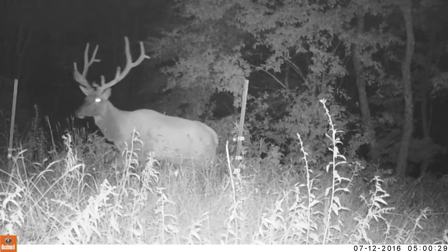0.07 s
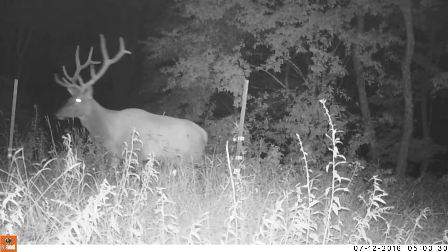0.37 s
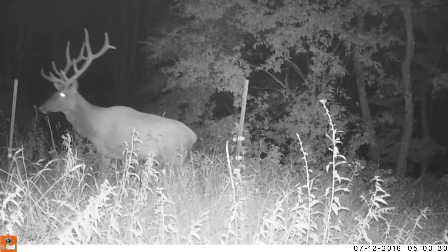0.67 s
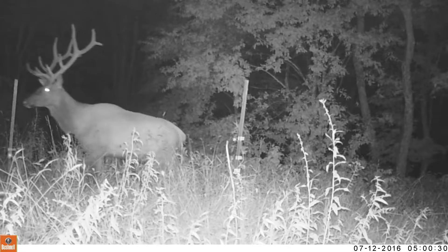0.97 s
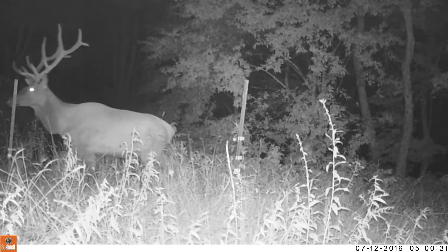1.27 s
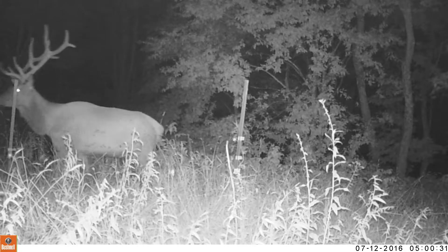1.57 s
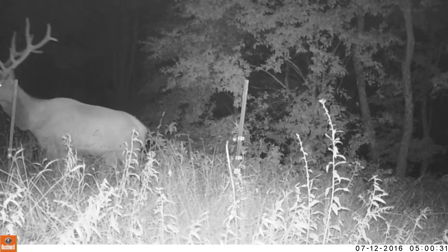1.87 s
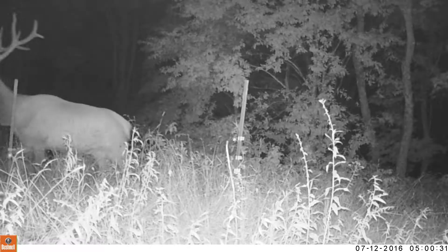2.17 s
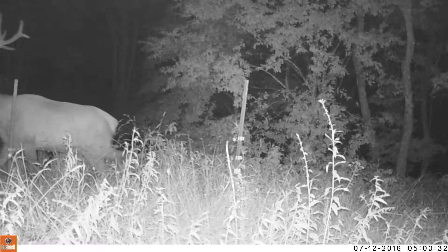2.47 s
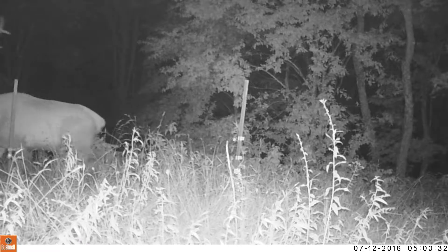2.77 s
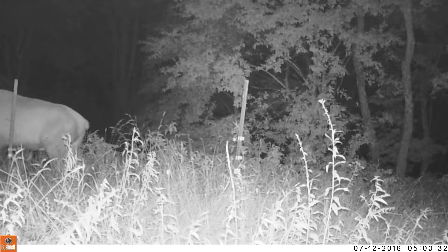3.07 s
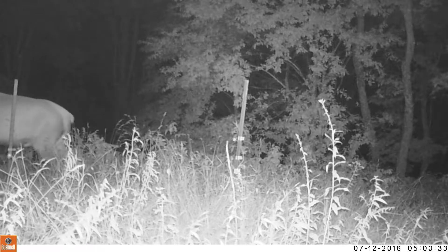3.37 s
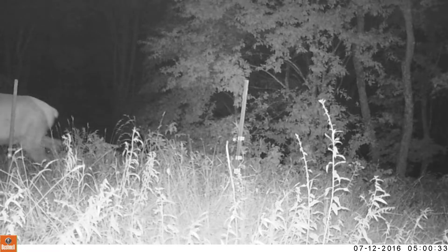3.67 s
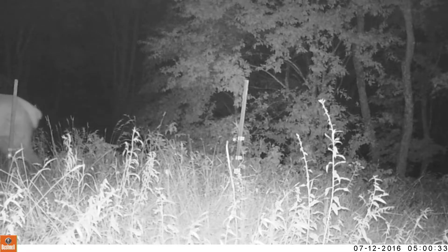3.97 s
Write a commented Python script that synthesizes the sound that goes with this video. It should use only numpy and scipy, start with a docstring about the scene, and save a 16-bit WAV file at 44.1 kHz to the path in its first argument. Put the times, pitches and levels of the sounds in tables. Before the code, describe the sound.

An elk walks through tall grass, making very faint, grainy swishes around 0.3 seconds, from 0.6 to 1.5, near 2 and 2.5, and from 3.1 to 4. Tiny dry stalk ticks come near 1, 1.9, 2.5, 3.1 and 4 seconds. Steady microphone rumble and hiss nearly cover everything, with a faint drifting murmur of night air and a few soft, dull bumps in roughly the first two seconds.

```python
"""An elk walks through tall grass at night, a few metres from a trail camera.
Each stride brushes the blades against its legs in a soft, grainy swish,
and now and then a bent dry stalk lets go with a tick. It all lies barely above the
microphone's steady rumble and hiss, with a few dull bumps and a faint murmur of night air."""
import sys
import numpy as np
from scipy import signal
from scipy.fft import rfft, irfft
from scipy.io import wavfile
from scipy.ndimage import uniform_filter1d

SR = 44100
rng = np.random.default_rng(int(sys.argv[2]) if len(sys.argv) > 2 else 0)


def wav_out(sig):
    """Save sig, one row per channel (or a flat mono array), as 16-bit PCM at SR to the path in sys.argv[1]."""
    wavfile.write(sys.argv[1], SR, np.round(np.clip(np.atleast_2d(sig).T, -1, 1) * 32767).astype(np.int16))


N = 176400

# leg swishes through the grass: centre t/s, half length/s, level/dB, hiss f/Hz, hiss width/Hz
SWISHES = [(.254, .028, -73, 5300, 1200), (.32, 0.026, -73.5, 4400, 2000), (.62, 0.026, -78.5, 4300, 2800),
           (0.79, .04, -78.5, 5200, 1400), (0.924, 0.051, -78.5, 4900, 2800),
           (1.102, 0.032, -79.5, 4360, 2800), (1.417, 0.039, -74, 5240, 2000),
           (1.515, 0.044, -75.5, 4370, 2400), (1.964, 0.071, -79.5, 4200, 2800),
           (2.343, .051, -84, 4600, 2800), (2.465, .028, -77.5, 5600, 650),
           (2.526, 0.12, -78.5, 3870, 2800), (3.107, 0.087, -76, 4400, 2700), (3.27, .018, -77, 5500, 1100),
           (3.31, 0.049, -77.5, 3500, 1500), (3.60, .17, -81, 4700, 2800), (3.97, 0.047, -77, 5050, 1700)]
# EQ curve of brushed blades: f/Hz, level/dB
BLADE_EQ = [(500, -9), (2000, -11), (3000, -0.5), (3900, 0), (5600, -7), (6800, -5.5), (9000, -13),
            (13500, -11)]
# dry stalk ticks: t/s, level/dB, f/Hz, decay/s
STALK_TICKS = [(.896, -69, 5300, .003), (0.999, -64, 3300, 0.0018), (1.089, -69.3, 4300, .002),
               (1.884, -69.5, 4600, .003), (2.525, -69, 3470, .005), (3.042, -67, 3600, .002),
               (3.114, -71, 4150, .01), (3.967, -68.5, 5000, .002)]
# soft bumps in the rumble: centre t/s, level/dB, f/Hz
LOW_BUMPS = [(.07, -56, 30.2), (.705, -50, 29.8), (1.11, -50.5, 49.3), (1.419, -51.5, 58),
             (2.09, -49.5, 41.4)]
# fader curve of the night air: t/s, level/dB
AIR_LEVELS = [(0, -84), (.25, -71), (.5, -78), (.76, -70), (1.0, -76.5), (1.45, -75.5), (1.97, -73.5),
              (2.4, -79.5), (3.2, -74), (4, -76)]
# EQ curve of the microphone's rumble and hiss: f/Hz, level/dB
MIC_NOISE_EQ = [(5, -17), (9, 5.5), (18, 3), (27, -2), (50, -7), (100, -12), (170, -16), (240, -20.5),
                (310, -22.5), (400, -27.5), (800, -34.5), (1400, -39.5), (2500, -44), (5000, -47),
                (7000, -49.5), (10000, -50.5), (13500, -51)]


def grass_swishes(t):
    """Blades flick and rub against the legs; each swish swells and fades with its own band of hiss."""
    flicks_per_s, spread_db, rub_db, blades_db = 1400, 4, -2, 0.5
    flutter_db, flutter_per_s = 1, 22
    flicks = (rng.random(N) < flicks_per_s / SR) * rng.choice([-1, 1], N)
    accents = undb(spread_db * np.minimum(rng.exponential(size=N), 4))  # a few grains stand out
    rub = undb(rub_db) * rng.standard_normal(N)
    blades = colour(unit(flicks * accents) + rub, BLADE_EQ)
    out = np.zeros(N)
    for middle, half, db, hz, width_hz in SWISHES:
        hiss = band(rng.standard_normal(N), hz, width_hz)
        grains = undb(blades_db) * np.roll(blades, rng.integers(N))  # fresh texture for each swish
        out += undb(db) * swell(t, middle, half) * unit(hiss + grains)
    return out * undb(flutter_db * walk(flutter_per_s))


def swell(t, middle, half):
    """A smooth rise and fall."""
    return np.exp(-.5 * ((t - middle) / half) ** 2)


def stalk_ticks(t):
    """A bent stalk lets go with a tiny dry tick: instant attack, fast decay."""
    out = np.zeros(N)
    for start, db, hz, decay_s in STALK_TICKS:
        fade = (t >= start) * np.exp(-np.abs(t - start) / decay_s)
        out += undb(db) * fade * band(rng.standard_normal(N), hz, width_hz=1300)
    return out


def low_bumps(t):
    """The rumble swells briefly into soft, dull bumps."""
    out = np.zeros(N)
    for middle, db, hz in LOW_BUMPS:
        low_end = band(rng.standard_normal(N), hz, width_hz=54)
        out += undb(db) * swell(t, middle, half=0.023) * low_end
    return out


def night_air(t):
    """Air murmurs faintly in the low mids, drifting in level."""
    level_db = np.interp(t, *np.array(AIR_LEVELS).T)
    return undb(level_db) * band(rng.standard_normal(N), hz=452, width_hz=410)


def microphone_noise():
    """The microphone lays down a steady bed of deep rumble and thin hiss."""
    return undb(-49) * colour(rng.standard_normal(N), MIC_NOISE_EQ)


def undb(db):
    """Decibels to gain."""
    return 10 ** (np.asarray(db) / 20)


def unit(x):
    """Scale to rms 1."""
    return x / np.sqrt(np.mean(x ** 2))


def colour(x, points):
    """Give a sound a spectrum of (Hz, dB) points, at rms 1."""
    hz, db = np.array(points).T
    bins = np.maximum(np.arange(N // 2 + 1) * SR / N, 1)
    return unit(irfft(rfft(x) * undb(np.interp(np.log(bins), np.log(hz), db)), N))


def band(x, hz, width_hz):
    """A broad resonance applied twice, at rms 1."""
    b, a = signal.iirpeak(min(hz, SR / 3), hz / width_hz, fs=SR)
    return unit(signal.lfilter(b, a, signal.lfilter(b, a, x)))


def walk(rate):
    """Random levels held 1 / rate s and slewed twice; spread 1."""
    k = int(SR / rate)
    steps = np.repeat(rng.standard_normal(N // k + 1), k)
    return unit(uniform_filter1d(uniform_filter1d(steps, k), k)[:N])


def scene():
    """A mono mix of the elk's swishes and ticks over the background bed."""
    t = np.arange(N) / SR
    elk = grass_swishes(t) + stalk_ticks(t)
    bed = low_bumps(t) + night_air(t) + microphone_noise()
    return (elk + bed)[None]


def record(dry):
    """The camera cuts the top end steeply."""
    cutoff_hz = 13950
    high_cut = signal.ellip(12, .1, 70, cutoff_hz, fs=SR, output="sos")
    return signal.sosfilt(high_cut, dry)


dry = scene()
out = record(dry)
wav_out(out)
```